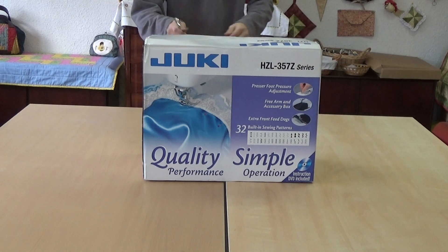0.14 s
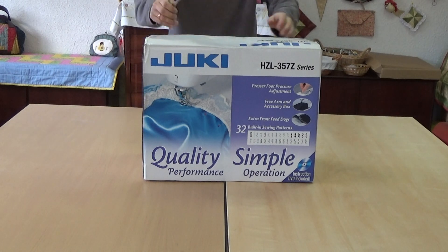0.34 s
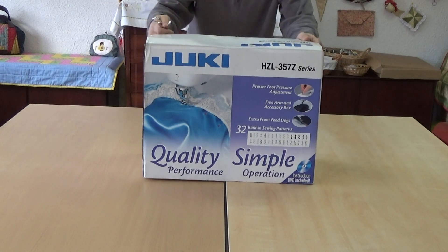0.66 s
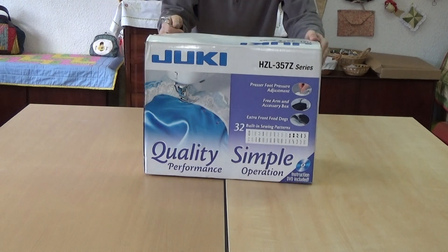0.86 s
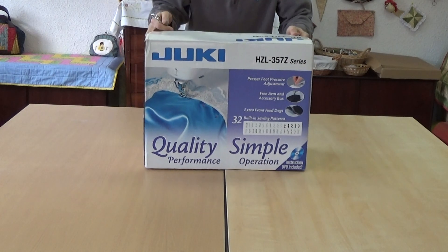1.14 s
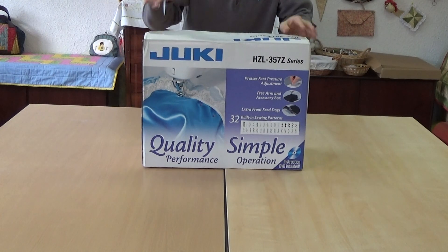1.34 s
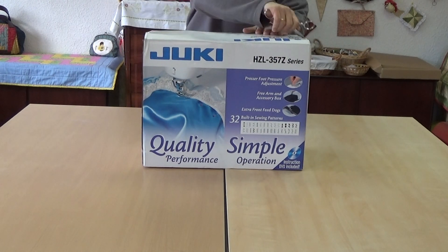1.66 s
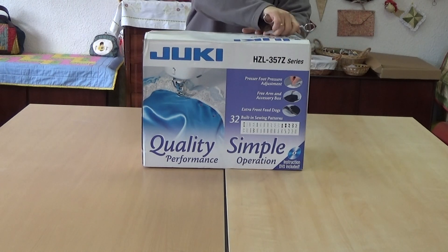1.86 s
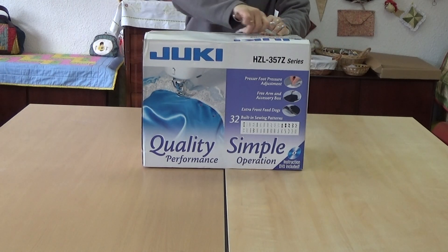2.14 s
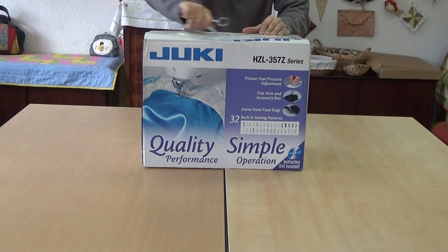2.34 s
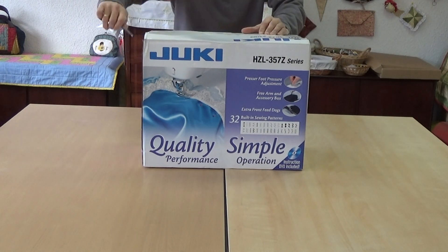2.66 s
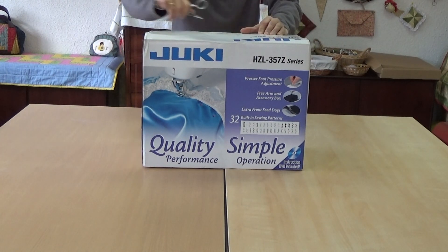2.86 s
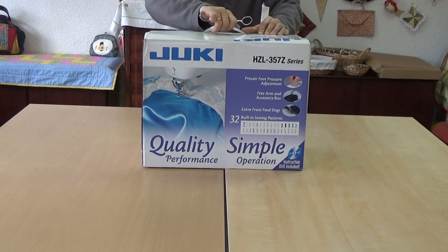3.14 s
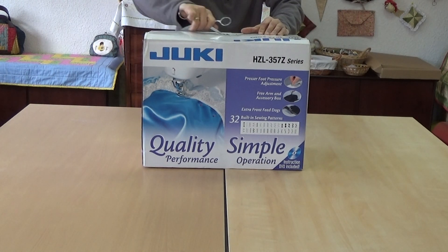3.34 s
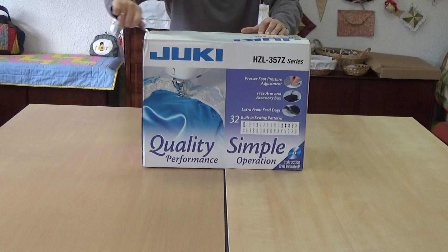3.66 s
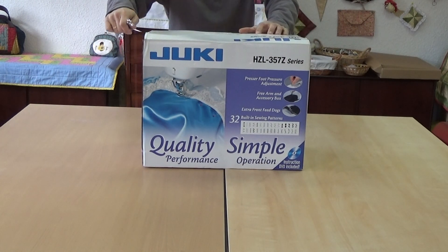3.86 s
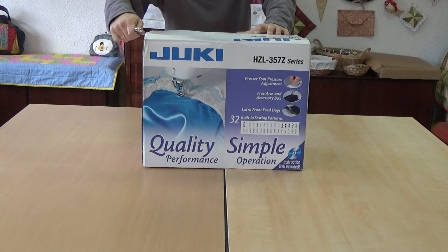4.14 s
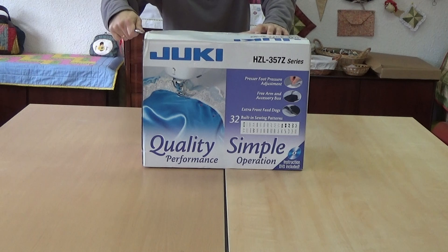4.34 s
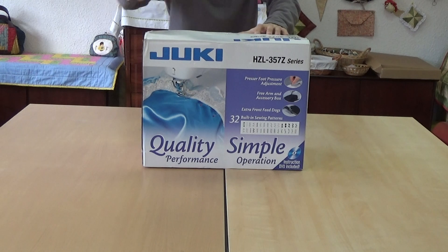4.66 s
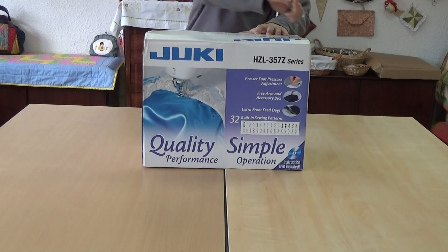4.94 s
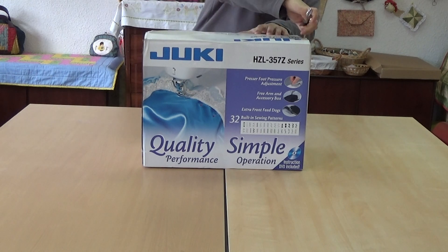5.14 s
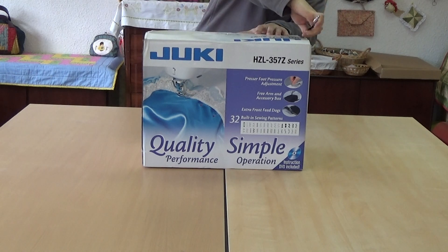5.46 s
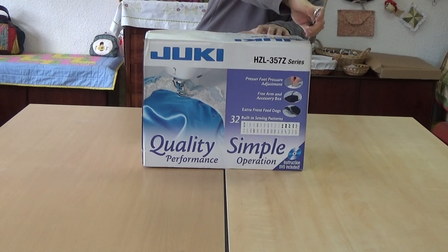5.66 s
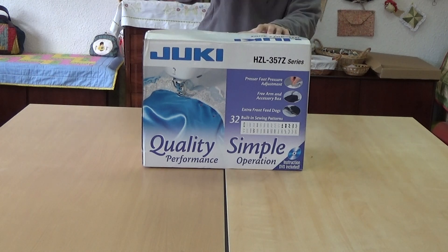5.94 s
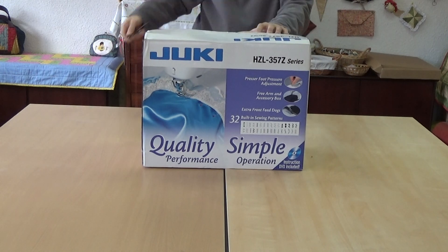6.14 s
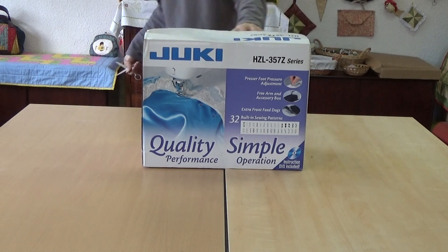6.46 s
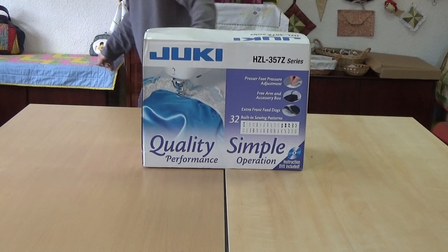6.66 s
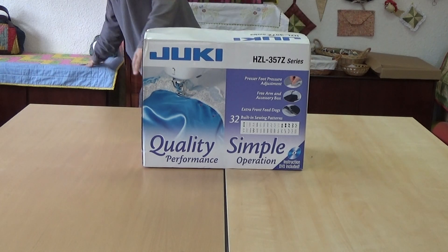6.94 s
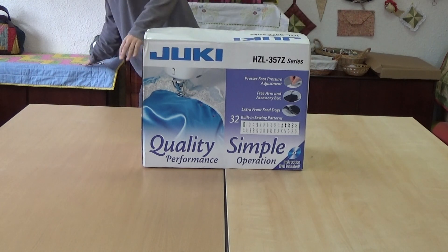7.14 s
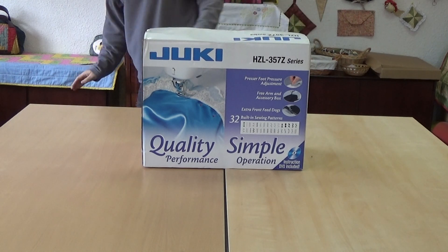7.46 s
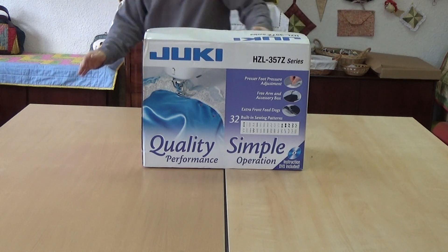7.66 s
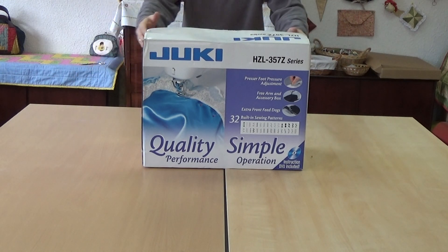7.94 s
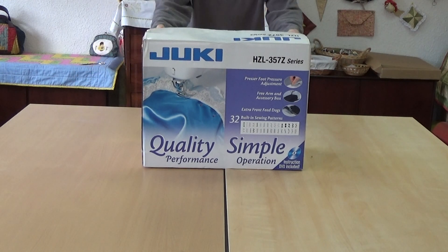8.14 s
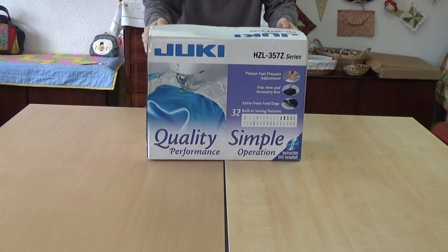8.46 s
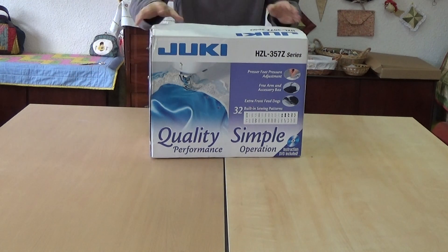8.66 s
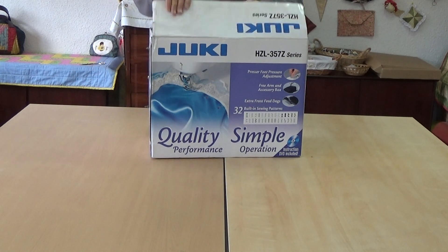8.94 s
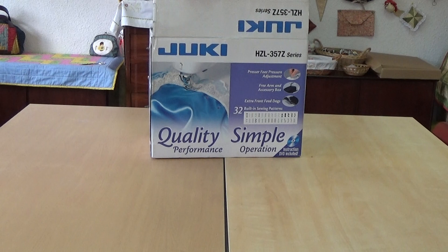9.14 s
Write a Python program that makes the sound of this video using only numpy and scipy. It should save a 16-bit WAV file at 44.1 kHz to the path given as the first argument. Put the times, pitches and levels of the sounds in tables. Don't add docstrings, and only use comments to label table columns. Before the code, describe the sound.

Hands rub and pat a hollow cardboard carton while scissors slit its tape in rasping rips, then flaps creak open over faint motor hum.

```python
import sys
import numpy as np
from scipy import signal
from scipy.fft import rfft, irfft, next_fast_len
from scipy.io import wavfile
from scipy.ndimage import uniform_filter1d, map_coordinates

SR = 44100
rng = np.random.default_rng(int(sys.argv[2]) if len(sys.argv) > 2 else 0)


def master(y):
    cut = np.clip(np.atleast_2d(y).T, -1, 1)
    pcm = np.round(cut * 32767)
    wavfile.write(sys.argv[1], SR, pcm.astype(np.int16))


def undo_db(level):
    steps = np.asarray(level, float) / 20
    return 10 ** steps


N = 410130

# frequency in Hz, level in dB per Hz.
HUSH_COLOUR = [(12, -28), (20, 9.5), (49, -10), (108, 4.5), (200, -3), (296, -4.5), (439, -6), (597, -9),
               (963, -13.5), (2000, -14), (2500, -9), (3500, -17.5), (4260, -15.5), (14300, -26),
               (16400, -35)]
# frequency in Hz, likeness up to 1.
HUSH_LIKENESS = [(40, 1), (180, 0.99), (550, 0.6), (1650, 0.28), (4970, 0.77), (15000, 0.85)]
# frequency in Hz, level in dB rms.
DRIVE_TONES = [
    (150.7, -66),
    (199.2, -57),
    (10492, -77),
]
# centre in Hz, width in Hz, level in dB.
DRIVE_CASING = [
    (2350, 560, -4),
    (4440, 170, 18),
    (6640, 820, 16),
]
# frequency in Hz, decay by 60 dB in seconds.
ROOM_DECAY = [(100, 0.4), (400, 0.37), (1000, 0.44), (3000, 0.32), (8000, 0.24), (15000, 0.26)]
# frequency in Hz, side against mid in dB.
ROOM_WIDTH = [(50, -20), (120, -39), (300, -30), (700, -8.5), (1500, -4.5), (6000, -2.5), (10000, -1.5),
              (13000, -23)]
# frequency in Hz, left over right in dB.
LEFT_LOUDER = [(110, .3), (160, 1.4), (640, 1.1), (1400, .2), (15000, 0)]
# frequency in Hz, phase by which the left leads in radians.
LEFT_EARLIER = [(110, .1), (160, .4), (600, .45), (1550, .33), (2410, .05), (16200, .1)]

# centre in Hz, width in Hz, level in dB.
BOOM_MODES = [
    (102, 13, -5.5),
    (152, 38, -0.5),
    (238, 18, -3.5),
]
# centre in Hz, width in Hz, level in dB.
PANEL_MODES = [(235, 79, -2), (344.6, 61, 1), (441, 41, 1.5), (543, 51, 0.5), (715, 190, -2.5),
               (853, 190, -3), (1110, 350, -6.5)]
# frequency in Hz, level in dB per Hz.
SCRAPE_COLOUR = [(150, -32), (530, 1), (900, 2), (1140, -1), (1530, 0), (2010, 1.5), (2370, 1.6),
                 (5210, -4.5), (5920, -5), (8000, -11), (10400, -71), (17600, -120)]
# frequency in Hz, level in dB per Hz.
FIZZ_COLOUR = [(3240, -23), (5500, -2.5), (5940, 3.5), (8300, 1), (10300, 2), (14800, -13), (15900, -15),
               (16400, -66)]

# start in seconds, pitch in Hz, level in dB, decay by 60 dB in seconds.
RING_EVENTS = [(.041, 7600, -45, 0.093), (.3, 2270, -22, 0.014), (.478, 105, -25, 0.085),
               (0.613, 152, -29, 0.14), (0.926, 1300, -47, 0.032), (4.815, 5040, -43, 0.12),
               (6.217, 4900, -38, .05), (6.217, 3000, -42, .05), (8.768, 3400, -35, 0.05),
               (8.775, 4400, -39, .04), (6.665, 10400, -49.5, 0.2), (6.731, 7650, -40, 0.12),
               (6.731, 9200, -36, .08), (6.731, 13100, -41, 0.088), (6.731, 13880, -44, .06),
               (6.999, 7400, -27, 0.096), (6.992, 13000, -22, 0.097), (8.977, 1990, -15, 0.056)]
# start in seconds, peak in
# dB, pitch in Hz, length in seconds.
PAT_EVENTS = [(0.237, -44.5, 387, 0.03), (0.477, -33.5, 158, 0.025), (0.607, -35, 350, 0.044),
              (0.919, -33, 1290, 0.027), (1.052, -40.5, 102, 0.17), (1.24, -40.5, 102, .07),
              (5.143, -41.5, 185, 0.041), (5.271, -38, 254, 0.025), (5.598, -21.5, 420, 0.088),
              (6.058, -46.5, 426, 0.019), (6.217, -36.5, 426, 0.031), (6.763, -35, 510, 0.089),
              (7.011, -28.5, 267, 0.11), (7.616, -42.5, 143, 0.016), (8.148, -40.5, 318, 0.039),
              (8.19, -40, 426, 0.019), (8.727, -40, 950, 0.031), (9.143, -28, 335, 0.027),
              (9.16, -29, 332, 0.051)]
# start in seconds, peak in dB, centre in Hz, length in seconds.
SCUFF_EVENTS = [(0.311, -39, 2320, 0.084), (0.343, -45.5, 1110, 0.04), (0.548, -39, 1790, .02),
                (0.605, -33.5, 670, 0.031), (0.612, -43, 1100, 0.046), (1.58, -38, 3000, 0.022),
                (1.793, -35.5, 8600, 0.026), (2.11, -29, 810, 0.036), (2.198, -28.5, 740, 0.056),
                (2.226, -27, 1660, 0.059), (2.4, -20, 1860, 0.047), (2.525, -19.5, 3600, 0.023),
                (2.647, -19.5, 2970, 0.02), (2.654, -23, 830, 0.022), (3.086, -31, 520, 0.013),
                (3.088, -32, 307, 0.014), (3.299, -30, 710, 0.057), (3.316, -34, 2040, 0.066),
                (3.409, -35, 1200, 0.025), (3.495, -17.5, 415, 0.028), (3.568, -17.5, 610, 0.015),
                (3.654, -23.5, 760, 0.03), (3.759, -30, 2510, 0.063), (4.151, -33, 250, 0.041),
                (4.471, -20.5, 349.7, 0.021), (4.543, -33, 3520, 0.038), (4.365, -30, 13500, 0.065),
                (4.573, -43, 2520, 0.074), (4.862, -40.5, 5200, 0.021), (5.565, -28, 1040, 0.15),
                (6.995, -18.5, 10000, 0.066), (7.713, -36, 390, 0.03), (8.765, -39, 3240, .02),
                (8.777, -42, 4400, .015), (8.978, -20.5, 1640, 0.012), (8.982, -17, 2820, 0.017),
                (9.145, -31, 400, 0.062), (.001, -44.5, 7450, 0.093), (4.145, -25, 710, 0.028),
                (4.813, -40, 15000, .02), (4.86, -46, 9800, .06), (5.283, -42.5, 2540, 0.25),
                (6.054, -47, 4000, 0.013), (6.223, -37, 6900, 0.056), (6.719, -36, 13000, .04),
                (6.999, -20.5, 876, 0.069), (8.764, -34, 8400, 0.017), (8.881, -25, 5200, 0.019),
                (9.139, -35.5, 149, 0.058), (8.977, -19.5, 5200, 0.039)]
# start in seconds, peak in dB, centre in Hz.
TICK_EVENTS = [(0.041, -31, 10500), (.204, -44, 11600), (.421, -51, 11500), (0.675, -28, 8900),
               (1.6232, -29, 3600), (1.7928, -31.5, 3080), (1.956, -31, 9907), (2.088, -24, 1540),
               (3.7426, -15, 2500), (4.198, -27, 10500), (4.968, -34, 4644), (4.995, -34, 4980),
               (5.222, -35, 3740), (5.796, -35, 9200), (6.2, -37, 7000), (8.253, -30, 4460),
               (8.2806, -14.5, 5030), (8.73, -34, 1500)]
# start in seconds, peak in dB, knock in dB, centre in Hz.
SNAP_EVENTS = [(0.2995, -33, 7.5, 2420), (0.4787, -53, -8, 1670), (0.5979, -44, -4.5, 1680),
               (1.508, -36, 2.5, 1560), (1.7345, -31, -13, 2640), (2.0142, -25.5, 4, 1520),
               (3.086, -39, 4, 2590), (3.238, -41, -13, 4030), (3.256, -26, -21, 2840),
               (4.0526, -33, -4, 3830), (4.1448, -15.5, 0.5, 3400), (4.1525, -16, -17, 2680),
               (4.2875, -15.5, -11, 3900), (4.4257, -18, 5.5, 2320), (4.816, -33.5, -8, 5370),
               (5.5048, -39, -21, 6120), (5.8889, -41, 2, 12500), (6.2156, -25.5, -21, 6060),
               (7.7146, -36, 6, 2370), (8.8382, -30, 1, 3000), (9.0494, -11.5, -9, 4500)]
# start in seconds, peak in dB, knock in dB, centre in Hz, length in seconds.
CRUNCH_EVENTS = [(0.244, -35.5, -15, 4360, 0.066), (1.072, -23.5, -13, 1780, 0.046),
                 (2.3497, -20.5, 21, 1900, 0.0059), (3.499, -20, -15, 2760, 0.01),
                 (3.745, -35, -30, 2570, 0.04), (4.3774, -22, -15, 2160, 0.01),
                 (5.542, -28, 6, 1200, 0.014), (5.594, -8, -13, 1600, 0.013),
                 (6.727, -28, -27, 9200, 0.024), (6.991, -9, -1, 1520, 0.033),
                 (7.859, -35.5, -3, 6430, 0.034), (8.022, -30, -7, 2280, 0.0068),
                 (8.763, -34, -25, 3300, 0.025), (8.8754, -20.5, -4, 4870, 0.064),
                 (8.979, -17, -30, 2020, 0.018), (9.2625, -10, -12, 5270, 0.033)]
# start in seconds, peak in dB, pitch in Hz.
TEAR_EVENTS = [(.677, -20, 9000), (.8596, -18, 9000), (.8709, -17, 7000), (.8745, -23, 7000),
               (.8761, -17, 7000), (.8798, -23, 8000), (.8907, -20, 6500), (.953, -21, 9000),
               (1.6225, -24, 12000), (1.663, -24, 13500), (1.734, -28, 12500), (1.7925, -24, 12500),
               (2.013, -20, 12000), (2.3406, -22, 12000), (2.3865, -13, 12000), (2.4688, -25, 12000),
               (2.5734, -7, 12000), (2.5797, -7, 12500), (2.5883, -5, 12000), (2.5967, -5, 12000),
               (2.6109, -6, 12000), (2.614, -9, 12000), (3.307, -30, 10000), (3.3279, -28, 11000),
               (3.3763, -30, 12000), (3.391, -27, 6000), (3.417, -31, 11000), (3.737, -20, 14000),
               (2.088, -28, 9000), (2.114, -32, 13500), (2.533, -17, 13000), (4.349, -21, 12000),
               (4.371, -21, 12000), (4.383, -19, 11000), (3.5165, -10, 11000), (3.5204, -7, 8000),
               (3.5243, -4, 12500), (3.5288, -10, 12000), (3.5301, -9, 13000), (3.535, -6, 12500),
               (3.579, -11, 10500), (3.5818, -3, 12000), (3.5894, -9, 11000), (3.6173, -11, 11000),
               (3.632, -11, 12000), (3.6368, -12, 12000), (4.757, -42, 10000), (4.863, -36, 11000),
               (5.025, -36, 12000), (5.554, -22, 13000), (5.581, -19, 12000), (5.6971, -30, 12000),
               (5.727, -34, 14000), (5.92, -42, 12000), (6.665, -36, 11000), (8.23, -26, 9500),
               (8.268, -28, 10500), (8.838, -29, 13000), (8.862, -28, 13000)]

# start in seconds, rise in seconds, hold in seconds, speed in dB, pressure in dB.
DRAG_STROKES = [
    (.474, 0.0037, .001, -42, 3.5),
    (1, 0.076, 0.25, -43.5, -15),
    (1.05, 0.034, 0.082, -41.5, -13),
    (2.285, 0.028, 0.09, -40, 9),
    (3.083, 0.0037, 0.00078, -46.5, 7),
    (3.24, 0.23, 0.026, -40, 12),
    (5.218, 0.0031, 0.16, -48, -18),
]
# start in seconds, rise in seconds, hold in seconds, speed in dB, pressure in dB.
HAND_STROKES = [(.22, 0.096, .001, -49, -7), (.57, 0.038, .001, -42, 1.5), (.6, 0.084, 0.25, -43, -4),
                (.914, 0.0024, 0.34, -42, -2), (1.48, 0.073, 0.00061, -48, 2.5),
                (1.7, 0.047, 0.063, -50, -9), (3.95, 0.32, .001, -45, 1.5), (4.5, 0.032, 0.45, -63.5, -1.5),
                (4.54, 0.0043, 0.011, -44, -18), (4.965, .005, 0.025, -56, -11),
                (5.25, 0.019, 0.013, -59, 13.5), (5.8, 0.011, 0.25, -61.5, 2),
                (6.25, 0.086, 0.2, -46.5, -6.5), (6.55, 0.085, 0.047, -56.5, 6.5),
                (6.73, 0.051, .001, -54.5, 15), (7.6, 0.14, 0.026, -58, 6), (7.78, 0.12, .04, -55, -44),
                (8.023, 0.0043, .001, -51.5, 10), (8.03, 0.014, 0.14, -43, -1.5),
                (8.255, .005, 0.045, -38, -8.5), (8.28, 0.19, 0.076, -37.5, -6),
                (8.3, 0.01, 0.31, -42.5, -3), (8.42, 0.03, 0.12, -52.5, 9), (8.6, 0.035, 0.28, -65, 19),
                (8.84, 0.035, .001, -34, -1), (9, 0.048, 0.37, -40.5, -4.5),
                (9.141, 0.0046, 0.00093, -38.5, 7)]
# start in seconds, rise in seconds, hold in seconds, speed in dB, pressure in dB.
TAPE_STROKES = [(4.345, 0.011, 0.044, -42, 2), (.039, 0.0016, 0.0089, -54.5, -24),
                (.856, 0.005, 0.026, -46, -7), (1.621, 0.0052, 0.045, -48, -13),
                (1.94, 0.056, .001, -48, 0), (2.34, 0.066, .001, -28.5, 7), (2.55, 0.07, .001, -32, -14),
                (3.5, 0.023, 0.11, -33.5, -10), (4.3, 0.18, .001, -38.5, 2), (6.727, 0.003, 0.04, -54, -24),
                (.549, .004, .04, -54.5, -8), (1.29, 0.017, 0.027, -55, -13),
                (3.236, 0.0031, 0.017, -49.5, -3), (5.69, .02, 0.055, -52, 2),
                (6.988, 0.01, 0.018, -33, 11), (7.97, 0.044, 0.13, -54.5, -24),
                (8.755, 0.017, 0.016, -45.5, 6)]
# start in seconds, rise in seconds, hold in seconds, speed in dB, pressure in dB.
BLADE_STROKES = [(2.012, 0.0013, 0.0076, -33, -4), (2.05, 0.045, 0.09, -41, 5),
                 (2.19, 0.05, 0.031, -37, 4.5), (2.24, 0.091, .001, -33, -5),
                 (2.325, 0.029, 0.081, -24.5, 3), (2.45, 0.0036, 0.18, -30.5, 3.5),
                 (2.45, 0.076, .001, -26, -10), (3.23, 0.078, 0.088, -42, 6.5),
                 (3.495, 0.018, 0.13, -29.5, 5.5), (3.62, 0.045, 0.051, -29, 4.5),
                 (4.142, 0.0033, 0.021, -33, 9.5), (4.281, 0.009, 0.1, -36.5, -23),
                 (4.3, 0.14, .001, -38.5, 10), (5.553, 0.0055, .01, -39, 4),
                 (5.553, 0.046, 0.00049, -23, -3.5), (6.213, 0.003, .001, -41, -19),
                 (8.972, 0.0025, 0.014, -28, -11.5)]
RELEASE_SPEEDS = (0.67, 1.25, 1.13, 0.96)

# air in dB, fizz in dB, release in dB per second.
HAND_FEEL, BLADE_FEEL = (-9.5, -7, 157), (-9, -9.5, 171)
TAPE_FEEL, DRAG_FEEL = (-11, 0.85, 220), (0, -12.5, 123)
RISE_DB, AIR_GROWS, FIZZ_DULLS = 14.5, 0.71, 0.15
PATCH_DB, JUDDER_DB = 1.3, 1.6
BEAT_S, TICK_S, CHIRP_S = 0.04, 0.009, 0.023
ECHO_S, ECHO_DB, ECHO_TOP_HZ, ECHO_SMEAR_S = 0.0062, -2, 9000, 0.0015
SNAP_S, TICK_KNOCK_DB = 0.0037, -11
SCUFF_WIDTH, SCUFF_RISE = 0.32, 0.2
TOP_HZ = 15900


def unit(x):
    return x / np.sqrt(np.mean(x ** 2) + 1e-20)


def along(points, hz):
    f, v = np.transpose(points)
    return np.interp(np.log(hz + 1), np.log(f + 1), v)


def wobble(rate):
    coarse = np.arange(0, N + 32, 32)
    knots = rng.standard_normal(int(N * rate / SR) + 4)
    return np.interp(np.arange(N), coarse, map_coordinates(knots, [coarse * rate / SR]))


def filtered(x, response):
    length = x.shape[-1]
    m = next_fast_len(length + 8192)
    hz = np.fft.rfftfreq(m, 1 / SR)
    return irfft(rfft(x, m) * response(hz), m)[..., :length]


def resonant(modes):
    def response(f):
        total = 0
        for k, (centre, width, db) in enumerate(modes):
            damping = 1j * f * width
            total = total + (-1) ** k * undo_db(db) * damping / (centre * centre - f * f + damping)
        return total
    return response


def add(track, s, sound):
    part = track[round(s * SR):][:len(sound)]
    part += sound[:len(part)]


def hush():
    def mid_and_side(f):
        angle = np.arccos(np.clip(along(HUSH_LIKENESS, f), -1, 1)) / 2
        return undo_db(along(HUSH_COLOUR, f)) * [np.cos(angle), np.sin(angle)]
    mid, side = filtered(rng.standard_normal((2, N)), mid_and_side)
    return undo_db(-53) * unit(np.array([mid + side, mid - side]))


def drive():
    t = np.arange(N) / SR
    tones = np.zeros(N)
    for hz, db in DRIVE_TONES:
        level = np.sqrt(2) * undo_db(db + 0.63 * wobble(4.68))
        tones += level * np.sin(2 * np.pi * hz * t + 0.46 * wobble(2.93))
    rumble = unit(filtered(rng.standard_normal(N), lambda f: resonant([(46, 18, 0)])(f) ** 2))
    whir = unit(filtered(rng.standard_normal(N), resonant(DRIVE_CASING)))

    beat = ((t - TICK_S) // BEAT_S).astype(int) + 1
    since = (t - TICK_S) % BEAT_S
    tick_db, chirp_db = rng.standard_normal((beat.max() + 1, 2))[beat].T
    click = np.sin(2 * np.pi * 2250 * since) + 0.7 * np.sin(2 * np.pi * 2950 * since)
    click *= np.exp(-since / 0.002)
    blip = np.exp(-((since - 0.0045) / 0.0028) ** 2) * np.sin(2 * np.pi * 3250 * since)
    blip *= undo_db(-7 * (beat % 2))
    chirp = np.exp(-((since + TICK_S - CHIRP_S) / 0.0075) ** 4)
    chirp *= undo_db(2.2 * chirp_db) * np.sin(2 * np.pi * 2520 * since + 0.4 * wobble(200))
    ticking = undo_db(tick_db) * (undo_db(-52) * click + undo_db(-54) * blip) + undo_db(-56.5) * chirp
    return tones + undo_db(-57) * rumble + ticking + undo_db(-69) * whir


def room(x):
    hop = SR // 3
    out = np.zeros((2, N + 2 * SR))
    window = np.hanning(2 * hop + 1)[:-1]
    padded = np.pad(x, (hop, 2 * hop))
    for start in range(0, N + hop, hop):
        hz, t, z = signal.stft(rng.standard_normal((2, SR * 6 // 10)), SR, nperseg=256)
        rise = 1 - np.exp(-(t / 0.00077) ** 2)
        decay = undo_db(-60 * t / along(ROOM_DECAY, hz)[:, None])
        tail = signal.istft(z * rise * decay, SR, nperseg=256)[1]
        tail = tail / np.linalg.norm(tail[0])
        piece = padded[start:start + 2 * hop] * window
        wet = signal.fftconvolve(piece[None], tail, axes=1)
        out[:, start:start + wet.shape[1]] += wet
    mid, side = out[:, hop:hop + N]
    side = filtered(side, lambda f: undo_db(along(ROOM_WIDTH, f)))
    return np.array([mid + side, mid - side])


def wall(x):
    t = np.arange(SR // 50) / SR
    burst = rng.standard_normal(len(t)) * undo_db(-20 * t / ECHO_SMEAR_S)
    late = lambda f: np.exp(-2j * np.pi * f * ECHO_S) / (1 + 1j * f / ECHO_TOP_HZ)
    echo = filtered(burst / np.linalg.norm(burst), late)
    return undo_db(ECHO_DB) * signal.oaconvolve(x, echo)[:N]


def rings():
    out, t = np.zeros(N), np.arange(SR // 4) / SR
    for s, hz, db, t60 in RING_EVENTS:
        shiver = (0.03 + 0.2 * (hz / 1e4) ** 3) * np.cumsum(rng.standard_normal(len(t)))
        shape = undo_db(db - 60 * t / t60) * (1 - np.exp(-t / 0.004))
        add(out, s, shape * np.sin(2 * np.pi * hz * t + shiver))
    return out


def pats():
    thuds, t = np.zeros(N), np.arange(SR // 5) / SR
    for s, db, hz, length in PAT_EVENTS:
        push = rng.standard_normal(len(t)) * undo_db(-20 * t / length) * (1 - np.exp(-t / 0.005))
        tone = resonant([(hz, 0.5 * hz, 0)])
        ring = filtered(push, lambda f: tone(f) ** 2 + 0.067 * resonant(PANEL_MODES)(f))
        add(thuds, s, undo_db(db) * ring / np.abs(ring).max())
    return thuds


def scuffs():
    out, t = np.zeros(N), np.arange(SR // 6) / SR
    for s, db, hz, length in SCUFF_EVENTS:
        shape = undo_db(-20 * t / length) * (1 - np.exp(-t / (SCUFF_RISE * length)))
        tone = resonant([(hz, SCUFF_WIDTH * hz, 0)])
        band = filtered(rng.standard_normal(len(t)) * shape, lambda f: tone(f) ** 2)
        add(out, s, undo_db(db - 4) * band / np.abs(band).max())
    return out


def contacts(table, rise, width, crack_db, push_db):
    cracks, pushes, t = np.zeros(N), np.zeros(N), np.arange(SR // 8) / SR
    for s, db, knock_db, hz, length in table:
        shape = undo_db(-20 * t / (length + 0.0008)) * (1 - np.exp(-t / (rise * length + 0.0001)))
        tone = resonant([(hz, width * hz, 0)])
        bright = lambda f: (1j * f / (0.5 * hz + 1j * f)) ** 2
        crack = filtered(rng.standard_normal(len(t)) * shape, lambda f: tone(f) + 0.064 * bright(f))
        add(cracks, s, undo_db(db + crack_db) * crack / np.abs(crack).max())
        add(pushes, s, undo_db(db + knock_db + push_db) * rng.standard_normal(len(t)) * shape)
    return cracks + filtered(pushes, resonant(PANEL_MODES))


def tears():
    clicks, t = np.zeros(N), np.arange(SR // 200) / SR
    for s, db, hz in TEAR_EVENTS:
        add(clicks, s, undo_db(db - 5 - 60 * t / 0.001) * np.sin(2 * np.pi * hz * t))
    return clicks


def slips(rate, spread_db, smooth):
    chance, size, sign = rng.random(N), rng.exponential(1, N), rng.standard_normal(N)
    kicks = (chance < rate / SR) * np.sign(sign) * undo_db(spread_db * np.minimum(size, 4))
    return np.sqrt(1 - smooth) * unit(kicks) + np.sqrt(smooth) * rng.standard_normal(N)


def patchy(x):
    z = signal.stft(x, nperseg=512)[2]
    field = uniform_filter1d(rng.standard_normal(z.shape), 8, 0)
    field = uniform_filter1d(field, 8, 1)
    return signal.istft(z * undo_db(PATCH_DB * unit(field)), nperseg=512)[1][:N]


def strokes():
    t, power = np.arange(0, N / SR + 0.002, 0.001), 1e-12
    kinds = ((HAND_STROKES, HAND_FEEL), (BLADE_STROKES, BLADE_FEEL),
             (TAPE_STROKES, TAPE_FEEL), (DRAG_STROKES, DRAG_FEEL))
    for table, (air_db, fizz_db, release) in kinds:
        for s, rise, hold, db, press_db in table:
            top = s + rise
            up_db = np.where(t < s, -200, RISE_DB * np.minimum((t - top) / rise, 0))
            down_db = release * np.outer(RELEASE_SPEEDS, np.maximum(t - top - hold, 0))
            mix_db = [[air_db + AIR_GROWS * press_db], [press_db], [0], [fizz_db - FIZZ_DULLS * press_db]]
            power = power + undo_db(db + up_db - down_db + mix_db) ** 2
    return [np.interp(np.arange(N) / SR, t, 10 * np.log10(p)) for p in power]


def rubbing():
    boom_db, panel_db, scrape_db, fizz_db = strokes()
    judder_db = JUDDER_DB * wobble(30)
    fizz_judder_db = JUDDER_DB * wobble(40)
    boom = unit(filtered(slips(300, 3.9, smooth=0.47), resonant(BOOM_MODES)))
    panels = unit(filtered(patchy(slips(700, 2.0, smooth=0.5)), resonant(PANEL_MODES)))
    scrape = unit(filtered(patchy(slips(1500, 3.6, smooth=0.66)), lambda f: undo_db(along(SCRAPE_COLOUR, f))))
    fizz = unit(filtered(patchy(slips(1200, 4, smooth=0.7)), lambda f: undo_db(along(FIZZ_COLOUR, f))))
    body = undo_db(boom_db - 4.5) * boom + undo_db(panel_db - 6.5 + judder_db) * panels
    skin = undo_db(scrape_db - 5 + judder_db) * scrape + undo_db(fizz_db - 2.5 + fizz_judder_db) * fizz
    return body + skin


def scene():
    quick = [(s, db, knock_db, hz, SNAP_S) for s, db, knock_db, hz in SNAP_EVENTS]
    quick += [(s, db, TICK_KNOCK_DB, hz, SNAP_S) for s, db, hz in TICK_EVENTS]
    sharp = contacts(quick, 0.021, 0.4, crack_db=-3, push_db=10.5) + tears()
    crunches = contacts(CRUNCH_EVENTS, 0.54, 0.34, crack_db=-9, push_db=7)
    table = rubbing() + sharp + crunches + pats() + rings() + scuffs() + wall(sharp)
    table = filtered(table, lambda f: (1j * f / (95 + 1j * f)) ** 2)
    heard = undo_db(4.5) * table + undo_db(-2) * room(table)

    def lean(f):
        left_over_right = undo_db(along(LEFT_LOUDER, f)) * np.exp(1j * along(LEFT_EARLIER, f))
        return left_over_right ** np.array([[0.5], [-0.5]])
    return filtered(heard, lean) + drive() + hush()


def roll_off(x):
    return signal.sosfilt(signal.butter(12, 16620, fs=SR, output="sos"), x)


def record(dry):
    kept = filtered(dry, lambda f: undo_db(-np.clip(f - TOP_HZ, 0, 1500) / 9))
    return roll_off(kept)


dry = scene()
out = record(dry)
master(out)
```